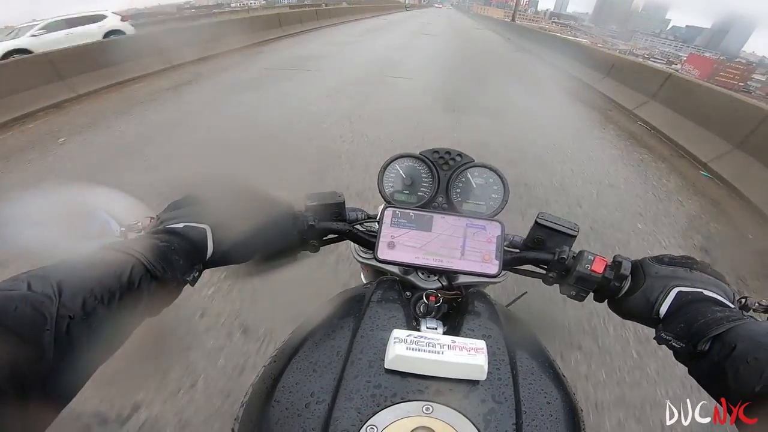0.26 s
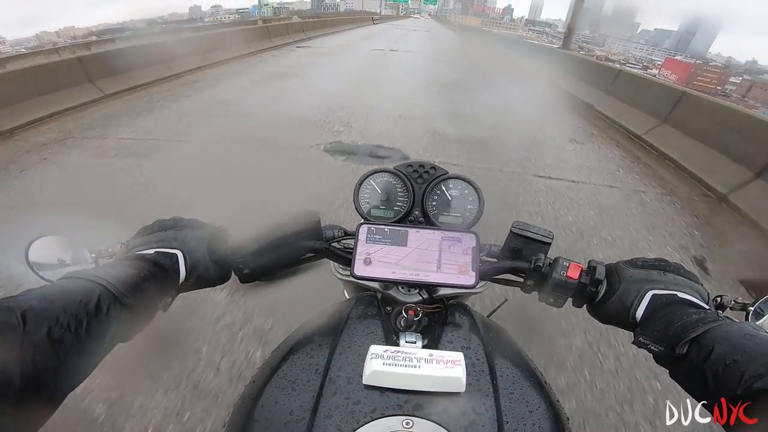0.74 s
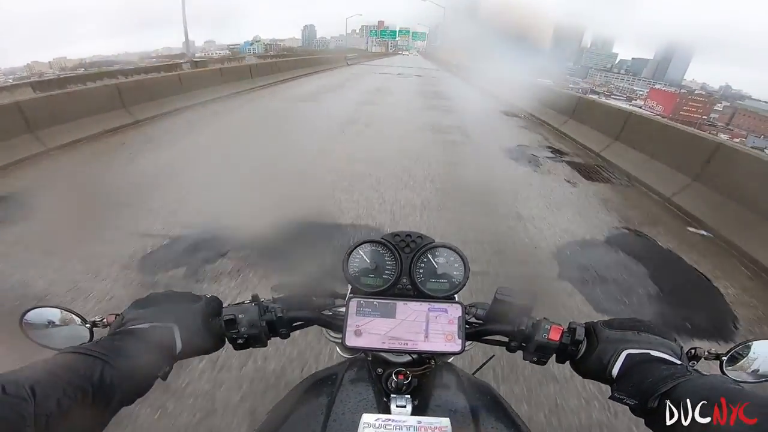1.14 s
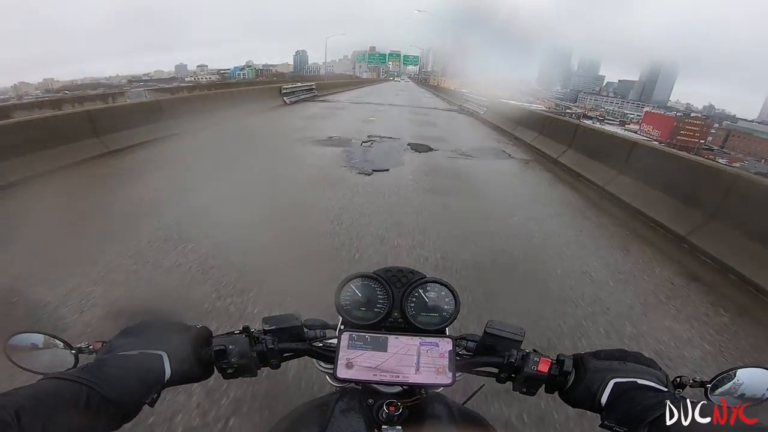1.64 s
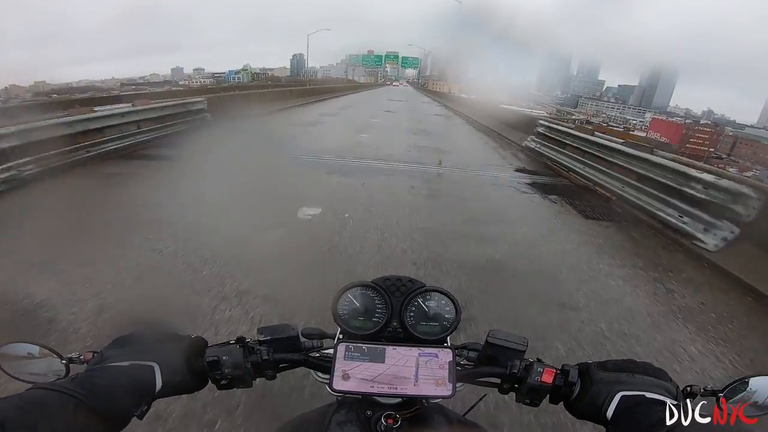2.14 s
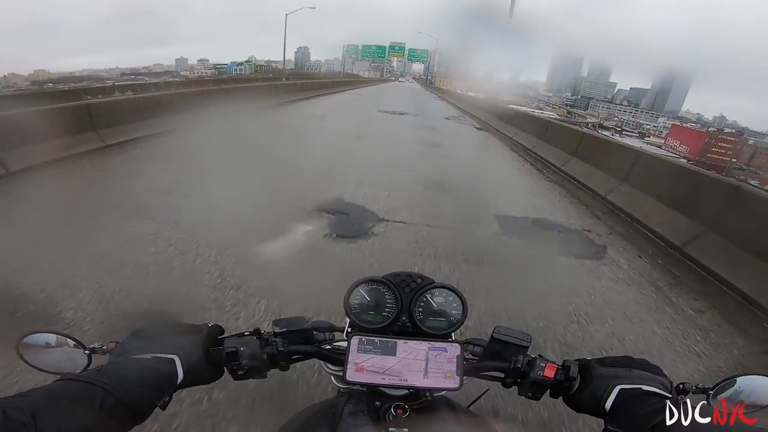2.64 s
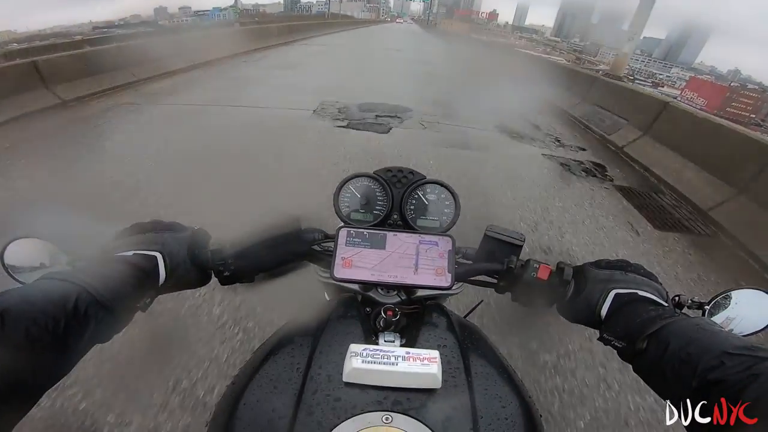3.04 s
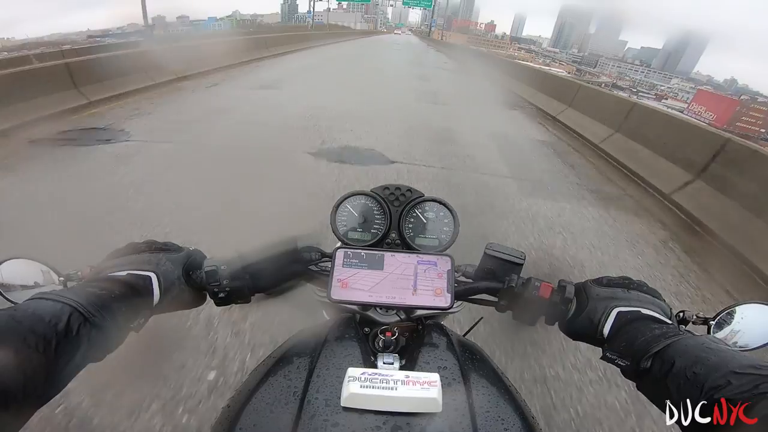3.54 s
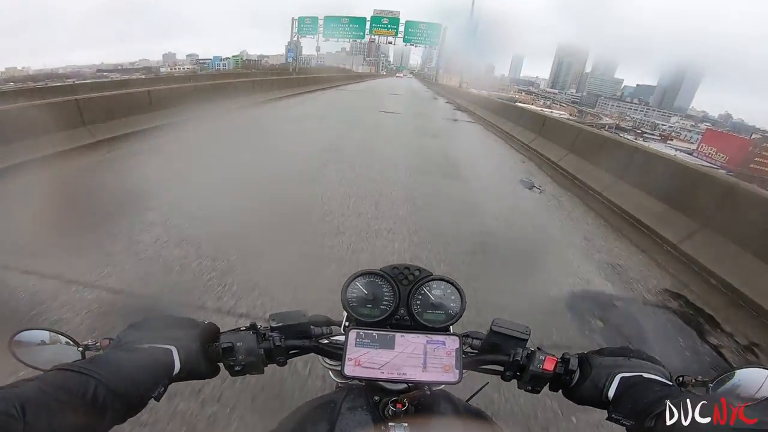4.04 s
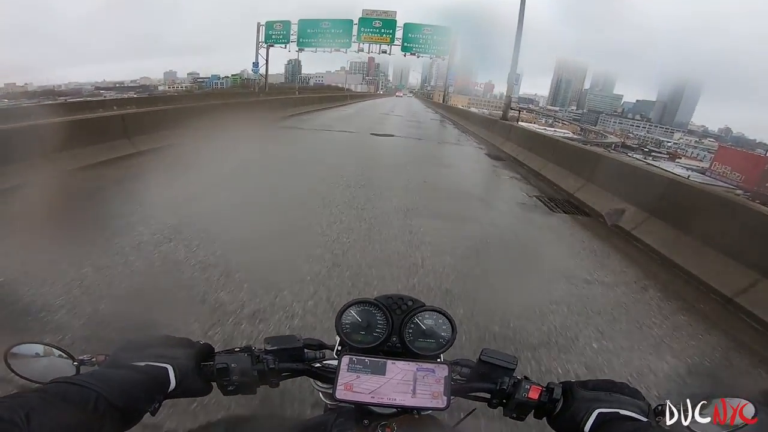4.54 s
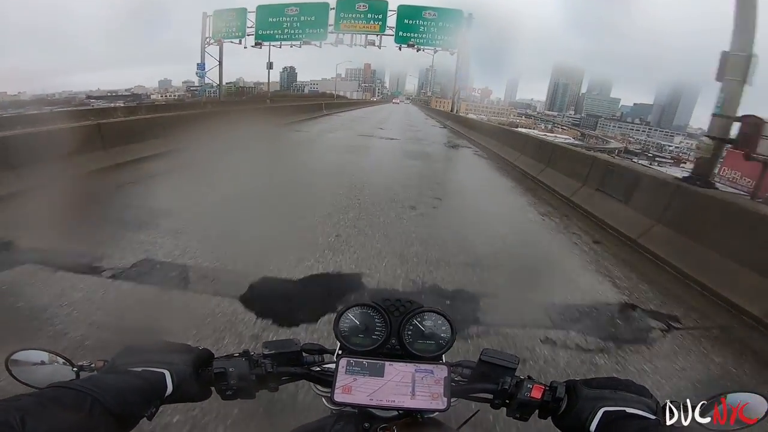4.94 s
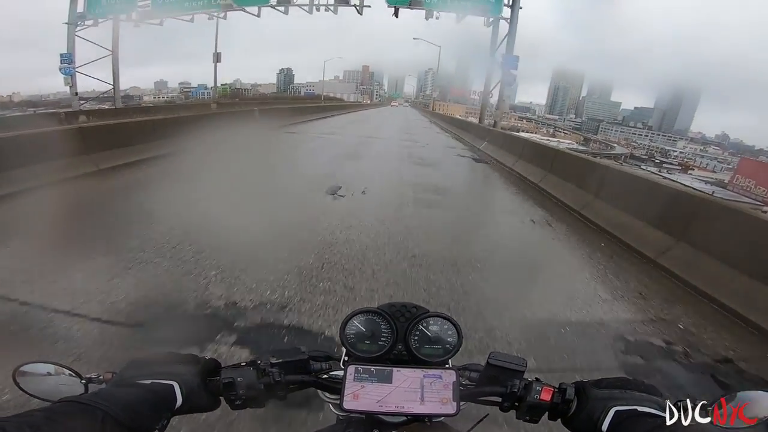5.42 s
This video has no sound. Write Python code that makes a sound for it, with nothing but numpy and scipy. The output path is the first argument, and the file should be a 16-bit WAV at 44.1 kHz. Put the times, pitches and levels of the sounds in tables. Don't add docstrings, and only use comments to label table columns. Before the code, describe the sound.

Heard from the rider's position on a wet highway, a twin-cylinder engine drones deeply and gradually drops in pitch. Low wind buffets the microphone, with spray hiss, faintly ringing metal and tiny grit ticks. A dull knock comes just past midway. Near the end the sound cuts out, then returns in brief, thin pieces among hard pops, thumps and a short buzz.

```python
import sys
import numpy as np
from scipy import signal
from scipy.fft import rfft, irfft
from scipy.io import wavfile
from scipy.ndimage import uniform_filter1d, map_coordinates

SR = 44100
rng = np.random.default_rng(int(sys.argv[2]) if len(sys.argv) > 2 else 0)


def transcribe(signal):
    frames = np.atleast_2d(signal).T
    limited = np.clip(frames, -1, 1)
    pcm = np.round(limited * 32767).astype(np.int16)
    wavfile.write(sys.argv[1], SR, pcm)


def undo_db(level):
    steps = np.asarray(level, float) / 20
    return 10 ** steps


N = 250488

# time in seconds, crank speed in turns per second, exhaust level in dB.
RIDE = [(0, 43.7, -13), (.3, 43.1, -13.5), (.6, 42.8, -13), (1.22, 41.9, -15), (1.42, 42.2, -15),
        (1.63, 41.7, -16), (1.85, 41.4, -14.5), (2.07, 40.6, -14.5), (2.2, 41.2, -14.5),
        (2.55, 40.6, -14.5), (3.2, 40.1, -14.5), (3.37, 39.4, -15.5), (3.6, 40.1, -15), (3.92, 39.5, -15.5),
        (4.14, 38.4, -15), (4.7, 38.1, -15), (4.8, 38.7, -15.5), (5.2, 37.85, -15.5)]
# time in seconds, height (0 tucked behind the dials, 1 raised into the spray).
HEAD = [(0, 0.16), (1, 0.4), (1.4, 0.46), (2.3, 0.55), (2.9, 0.25), (3.3, 0), (3.7, 0.24), (4.1, 0.52),
        (4.4, 0.46), (4.8, 0.46), (5.3, 0.47)]
SLIP_S = 5.05


def evened(x):
    return x / np.sqrt(np.mean(x ** 2) + 1e-20)


def coloured(points, count=N):
    point_hz, point_db = np.transpose(points)
    hz = np.fft.rfftfreq(count, 1 / SR)
    gain = undo_db(np.interp(np.log(hz + 1), np.log(point_hz + 1), point_db))
    return evened(irfft(rfft(rng.standard_normal(count)) * gain, count))


def wander(hz):
    knots = rng.standard_normal(600)
    return map_coordinates(knots, [np.arange(N) / SR * min(hz, 50) * 2], order=2)


def resonate(x, hz, width_hz):
    pole = signal.iirpeak(hz, hz / width_hz, SR)
    return signal.lfilter(*pole, signal.lfilter(*pole, x))


def follow(table, column):
    return np.interp(np.arange(N) / SR, [row[0] for row in table], [row[column] for row in table])


def crank():
    turns_per_s = follow(RIDE, column=1) * (1 + .002 * wander(12))
    return np.cumsum(turns_per_s) / SR


def exhaust(turns):
    # crank multiple, levels in dB when pulling, holding, easing.
    pipe = [(1, -26, -25, -24), (2, 0, 0, 0), (3, -9, -12, -4), (4, -17, -13, -12), (5, -13, -24, -24),
            (6, -24, -19, -22), (7, -18, -18, -21), (8, -14, -19, -12), (9, -19, -17, -10),
            (10, -28, -16, -24), (11, -22, -22, -23), (12, -20, -22, -20), (13, -29, -29, -30),
            (14, -31, -27, -27), (15, -31, -31, -32)]
    # time in seconds, throttle (0 pulling, 1 holding, 2 easing).
    throttle_moves = [(1.1, 0), (1.45, .9), (1.85, .9), (2, .2), (2.45, .3), (2.6, 1), (3.95, 1),
                      (4.12, 1.7), (4.55, 2), (4.8, 1.3), (5.1, 1)]
    lag_turns, lag_most_turns = .22, .45
    even_db = 3
    burble = 2.
    out, throttle = np.zeros(N), follow(throttle_moves, column=1)
    late = np.arange(N) > SLIP_S * SR
    uneven = 1 + burble * np.maximum(throttle - 1, 0) ** 2
    for k, *colour_db in pipe:
        drift_db = min(.25 * k, 1.5) * wander(4)
        db = np.interp(throttle, (0, 1, 2), colour_db) + drift_db + even_db * (-1) ** k * late
        lag = min(lag_turns * abs(k - 2), lag_most_turns) + (k > 6) * rng.random()
        jitter_turns = .004 * k * uneven * wander(20)
        out += undo_db(db) * np.cos(2 * np.pi * (k * turns - lag + jitter_turns))
    firing_db = rng.standard_normal(800)[(2 * turns).astype(int)]
    level_db = follow(RIDE, column=2) + 0.17 * uneven * uniform_filter1d(firing_db, 200)
    return np.sqrt(2) * undo_db(level_db) * out


def beat(turns, depth):
    angle = 2 * np.pi * turns
    return 1 + depth * (np.cos(angle) + 0.54 * np.cos(angle / 2) + 1.4 * np.cos(2 * angle))


def wind(turns):
    # frequency in Hz, density in dB per Hz.
    buffet_colour = [(1, -3), (3, 0), (12, -2), (22, -8), (32, -13), (50, -21), (150, -30), (600, -62),
                     (2000, -120)]
    roar_colour = [(40, -12), (70, 6.5), (105, 3.5), (150, 4), (200, -6.5), (360, -6), (600, -9.5),
                   (850, -12.5), (1300, -18.5), (2000, -32), (3000, -30), (6000, -120)]
    buffet_db, roar_db, roar_raised_db = -20.5, -32, -3.5
    buffet = undo_db(buffet_db + 1.2 * wander(3)) * coloured(buffet_colour)
    gust_db = .5 * wander(8.7) + 0.48 * wander(30)
    roar = coloured(roar_colour) * beat(turns, 0.056) * undo_db(gust_db)
    band = signal.sosfilt(signal.butter(4, (550, 1800), "band", fs=SR, output="sos"), roar)
    return buffet + undo_db(roar_db + roar_raised_db * follow(HEAD, column=1)) * roar / band.std()


def hiss(turns):
    # frequency in Hz, density in dB per Hz.
    spray_colour = [(1000, -13), (1600, -3.5), (2100, -8.5), (2900, -2), (4500, -4), (7000, -3.5),
                    (10300, -8), (12300, -15), (14000, -27.5), (15600, -46.5), (16300, -80)]
    # frequency in Hz, width in Hz, level in dB over the hiss.
    casing = [(850, 150, -3), (950, 40, -9), (1730, 100, -15), (2925, 45, -14), (4205, 110, -14),
              (5920, 500, -12), (7100, 300, -17)]
    # time in seconds, level in dB, frequency in Hz.
    ticks = [(0.0702, -20, 6300), (0.3721, -16, 7000), (0.405, -21, 7120), (0.4274, -25, 8290),
             (0.8545, -19, 9120), (0.8809, -23, 6020), (0.9757, -25, 6170), (0.9991, -23, 6100),
             (1.2201, -22, 7600), (1.2965, -24, 8090), (2.7526, -20, 6080), (2.7975, -21, 7250),
             (3.035, -23, 6540), (3.5643, -23, 7510), (3.6311, -24, 8270), (4.5965, -23, 8970)]
    hiss_db, hiss_raised_db, ring_db, ring_raised_db = -37.5, 4.5, -3, 3.5
    tick_samples, tick_decay_s = 130, .0008
    spray, white = coloured(spray_colour), rng.standard_normal(N)
    head = follow(HEAD, column=1)
    for hz, width_hz, db in casing:
        level_db = db + ring_db + ring_raised_db * head + 0.85 * wander(2.5)
        spray = spray + undo_db(level_db) * evened(resonate(white, hz, width_hz))
    level_db = hiss_db + hiss_raised_db * head + 0.56 * wander(15)
    out = undo_db(level_db) * evened(spray) * beat(turns + 0.48, 0.075)
    fade = np.exp(-np.arange(tick_samples) / SR / tick_decay_s)
    for s, db, hz in ticks:
        grit = resonate(rng.standard_normal(tick_samples), hz, 4500) * fade
        out[round(s * SR):][:tick_samples] += undo_db(db + 1.5) * grit
    return out


def knock():
    start_s, level_db, hz, decay_s = 3.229, -21, 830, .02
    age_s = np.maximum(np.arange(N) / SR - start_s, 0)
    rattle = evened(resonate(rng.standard_normal(N), hz, 150))
    return undo_db(level_db) * (age_s > 0) * np.exp(-age_s / decay_s) * rattle


def plug(x):
    # time in seconds, gain in dB,
    # bias step in full scale (below 0 held, above 0 a slow thump), pop height in full scale.
    contact = [(0, 0, 0, 0), (4.8433, -62, 0, 0), (4.907, -99, 0, 0), (4.9815, 0, .25, -.12),
               (5.003, -99, 0, .4), (5.0464, -40, -2.4, -.6), (5.0488, -20, .55, .4),
               (5.0617, -99, 0, -.25), (5.0887, -40, -1, -.6), (5.094, -16.5, .42, .5), (5.4195, -39, 0, 0),
               (5.4475, -34, 0, -.03), (5.4567, -24, 0, -.3), (5.4596, -54, 0, 0), (5.462, -8, -.06, 0),
               (5.4833, -24, 0, .25), (5.4875, -34, 0, 1.5), (5.5207, -54, 0, 0),
               (5.5383, -40, -1.05, -.55), (5.5411, -19, .15, .55), (5.547, -99, 0, -.25),
               (5.562, -40, 0, -1.0), (5.5675, -99, 0, -.85), (5.595, -16, .33, 0), (5.6104, -99, 0, -.28),
               (5.6593, -40, -.72, 0), (5.6643, -14, .3, .6)]
    pop_hz, pop_decay_s = 195, .001
    swing_base, swing_per_step = 2.6, 6.5
    thump_at_once = .1
    boom_hz, boom_lost = 76, .75
    t, table = np.arange(N) / SR, np.array(contact)
    row = np.searchsorted(table[:, 0], t, "right") - 1
    start_s, gain_db, step, jump = table[row].T
    step_change = abs(np.diff(table[:, 2], prepend=0))[row]
    swing = -jump * (swing_base + swing_per_step * step_change)
    age_s = t - start_s
    boom = signal.lfilter(*signal.iirpeak(boom_hz, 1.2, SR), x)
    x = x - boom_lost * (t > SLIP_S) * boom
    gain_db = np.minimum(gain_db + 18 * age_s, 0)
    held = np.exp(-age_s / .035)
    rise = 1 - (1 - thump_at_once) * np.exp(-age_s / .008)
    thump = rise * np.exp(-(age_s / .09) ** 1.5)
    bias = step * np.where(step < 0, held, thump)
    angle = 2 * np.pi * pop_hz * age_s
    pop = np.exp(-age_s / pop_decay_s) * (jump * np.cos(angle) + swing * np.sin(angle))
    return undo_db(gain_db) * x + bias + pop


def spare_input():
    # start in seconds, end in seconds, start level in dB, end level in dB, repeating share 0-1.
    breaks = [
        (4.8433, 4.907, -64, -68, 0),
        (5.434, 5.4567, -42, -13, .05),
        (5.4567, 5.4596, -16, -14, .05),
        (5.4833, 5.4875, -16, -18, .05),
        (5.4875, 5.5207, -10, -9, .92),
        (5.5633, 5.5675, -11, -6, .5),
    ]
    # multiple of the block rate, level in dB.
    block_partials = [(1, 4), (2, -0.5), (3, -13), (4, -3), (5, -8.5), (6, -31), (7, -19), (8, -25),
                      (9, -33), (10, -40), (11, -25), (12, -48.5), (13, -34), (14, -34.5), (15, -38),
                      (16, -43), (17, -44), (18, -35), (19, -44), (20, -42), (21, -38), (22, -43),
                      (23, -49), (24, -36), (25, -48)]
    # frequency in Hz, density in dB per Hz.
    spare_colour = [(47, -26), (80, 7), (281, -0.5), (955, -4), (1790, -11), (2540, -21), (4000, -22),
                    (5200, -37), (6760, -85), (11400, -120)]
    open_colour = [(9500, -70), (11200, -18), (12000, 0), (13800, -8), (15900, -20), (16400, -70)]
    # start in seconds, end in seconds, level in dB.
    open_spells = [
        (4.846, 4.906, -43),
        (4.9064, 4.9075, -33),
        (5.424, 5.46, -64),
        (5.636, 5.6372, -16),
    ]
    block_hz, block_start_s = 187.5, 5.4977
    t, out = np.arange(N) / SR, np.zeros(N)
    noise, thin = coloured(spare_colour), coloured(open_colour)
    buzz = np.zeros(N)
    for k, db in block_partials:
        lag = .06 * k * rng.standard_normal()
        buzz -= undo_db(db) * np.cos(2 * np.pi * (k * block_hz * (t - block_start_s) + lag))
    buzz = evened(buzz)
    for start_s, end_s, start_db, end_db, stuck in breaks:
        gain = undo_db(np.interp(t, (start_s, end_s), (start_db, end_db)))
        mixed = np.sqrt(stuck) * buzz + np.sqrt(1 - stuck) * noise
        out += ((t >= start_s) & (t < end_s)) * gain * mixed
    for start_s, end_s, db in open_spells:
        out += ((t >= start_s) & (t < end_s)) * undo_db(db + 1.8 * wander(50)) * thin
    return out


def scene():
    turns = crank()
    foam = signal.butter(6, 15000, fs=SR, output="sos")
    return signal.sosfilt(foam, exhaust(turns) + wind(turns) + hiss(turns) + knock())[None]


def roll_off(x):
    return signal.sosfilt(signal.butter(12, 18010, fs=SR, output="sos"), x)


def record(dry):
    wired = plug(dry[0]) + spare_input()
    limited = signal.oaconvolve(wired, signal.firwin(127, 16200, fs=SR), "same")
    clipped = np.clip(limited, -.96, .96)
    mix = signal.oaconvolve(clipped, signal.firwin(127, 17900, fs=SR), "same")
    return roll_off(mix[None])


dry = scene()
out = record(dry)
transcribe(out)
```